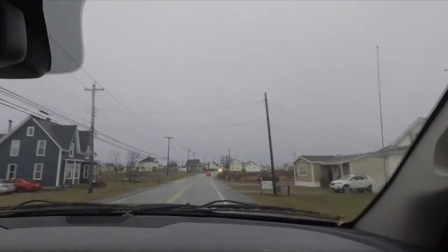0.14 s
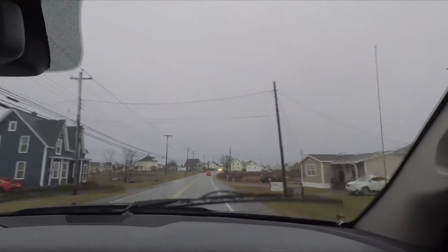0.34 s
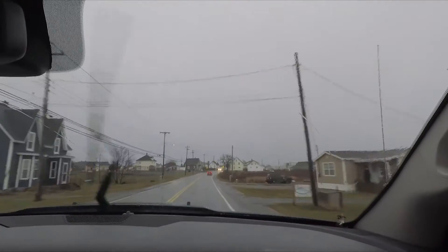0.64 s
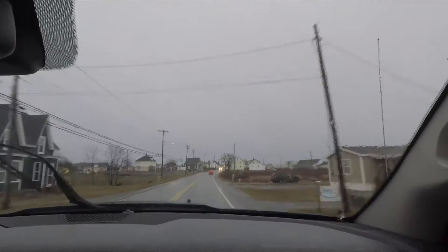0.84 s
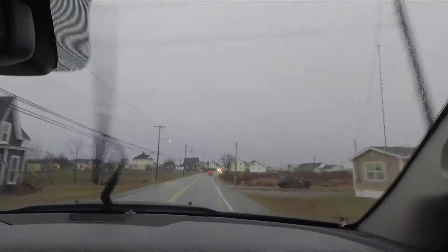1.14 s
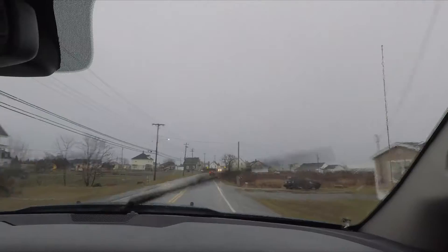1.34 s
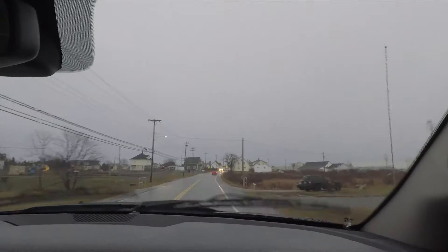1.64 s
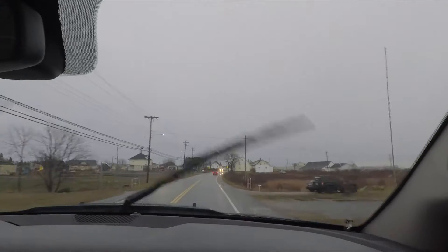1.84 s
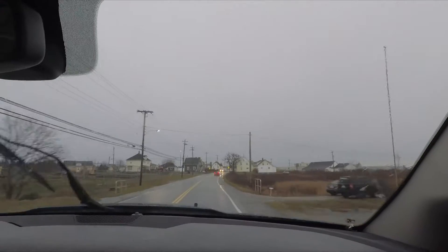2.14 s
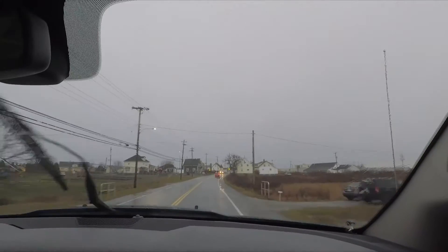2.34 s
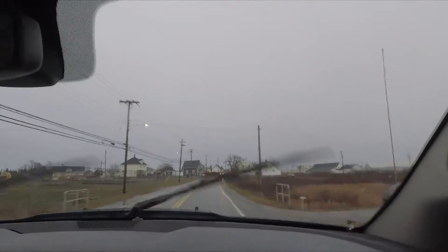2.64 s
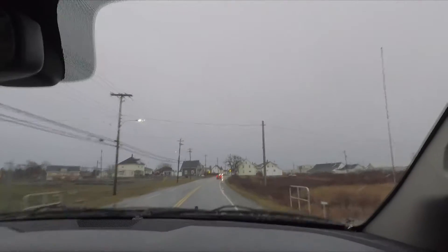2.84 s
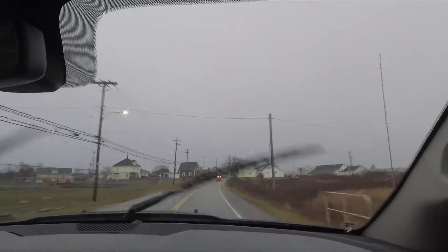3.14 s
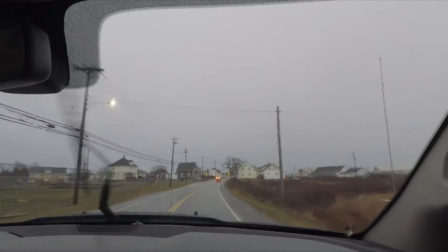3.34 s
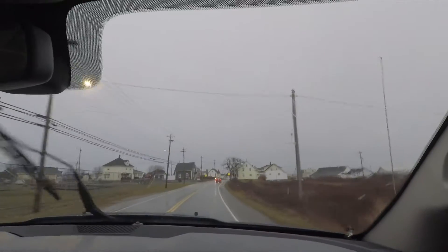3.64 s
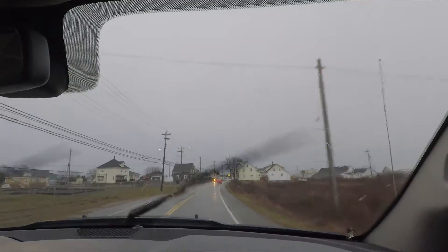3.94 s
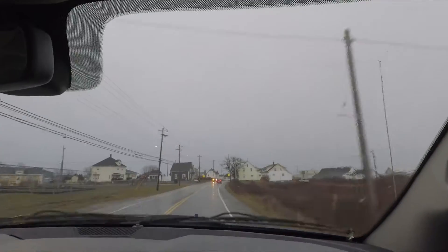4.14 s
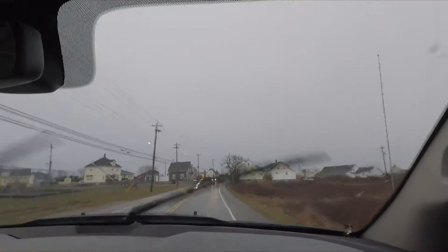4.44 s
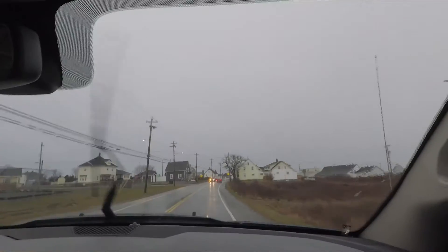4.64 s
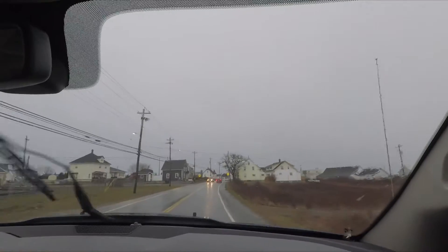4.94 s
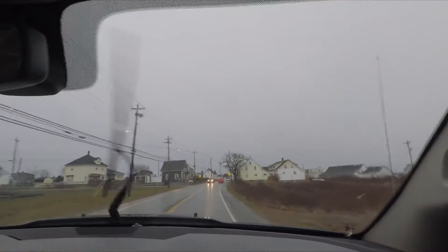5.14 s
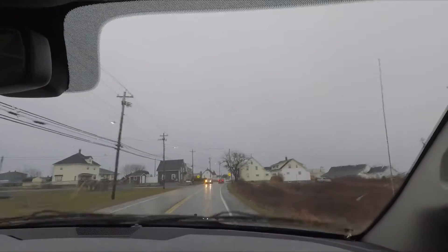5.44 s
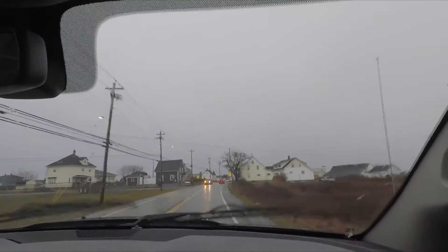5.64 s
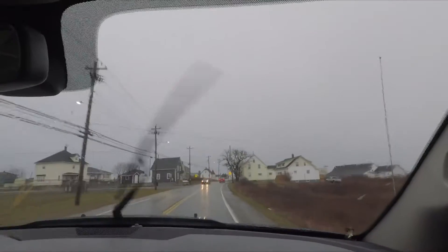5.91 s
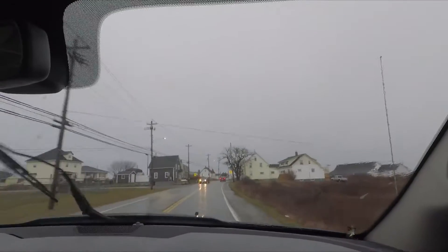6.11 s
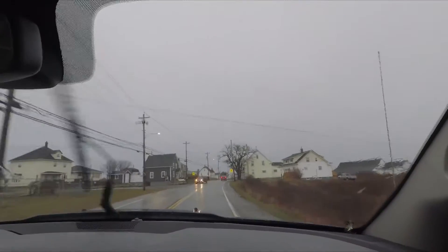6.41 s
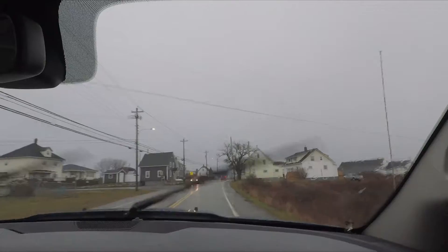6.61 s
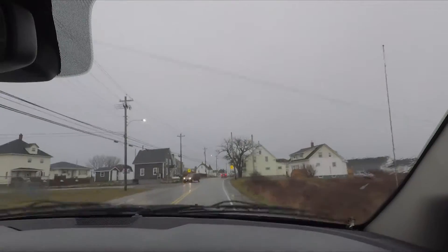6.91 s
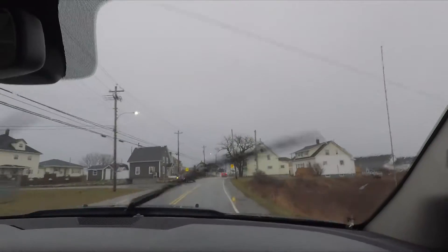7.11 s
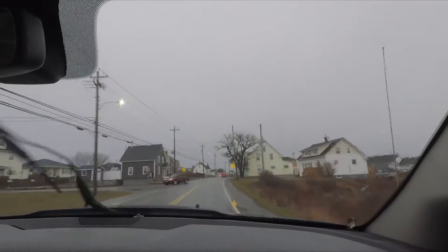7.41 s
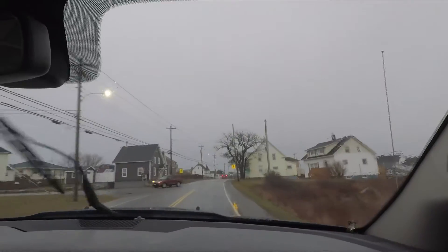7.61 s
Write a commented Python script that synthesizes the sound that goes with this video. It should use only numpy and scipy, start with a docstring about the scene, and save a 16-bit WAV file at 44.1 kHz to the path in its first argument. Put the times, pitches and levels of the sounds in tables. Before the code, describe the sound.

Inside a driving car, dense crisp raindrop taps patter over deep road rumble and a wavering engine drone, with bumps near the end.

```python
"""Heavy rain on a car, heard from inside as it drives.
Drops on windscreen and roof are impulses filtered by a crack, a splat and a padded cabin tail; spray is a faint hiss.
Tyres and body rumble as filtered noise; the engine booms and hums as narrow noise and a throbbing line.
Knocks, some far left, and wheel bumps on a rough patch ring low modes, each with a brush of noise."""
import sys
import numpy as np
from scipy import signal
from scipy.fft import rfft, irfft, next_fast_len
from scipy.io import wavfile

SR = 44100
rng = np.random.default_rng(int(sys.argv[2]) if len(sys.argv) > 2 else 0)


def int16_out(signal):
    """Quantize to a 16-bit WAV file."""
    q = np.round(np.clip(np.atleast_2d(signal).T, -1, 1) * 32767)
    wavfile.write(sys.argv[1], SR, q.astype(np.int16))


def convert_level_to_amplitude(level_db):
    """Map a level in decibels to its linear amplitude factor."""
    exponent = np.asarray(level_db, float) / 20
    return 10 ** exponent


N = 342636

# phase lead of the left ear point: hz, left_lead_rad
LEFT_LEAD = [(30, 0), (400, 0), (690, -.3), (1460, .6), (2070, .1), (2840, -.5), (4650, .1), (6000, -.5),
             (7150, .1), (7600, 3.1), (10000, 3.1), (11500, .1)]
SIDES = np.array([[.5], [-.5]])   # splits a left-right difference over the two channels
SPLAT_T60_S = 0.0052   # on bare glass


def rms_one(x):
    """Scale to rms 1."""
    return x / np.sqrt(np.mean(x ** 2) + 1e-20)


def in_time(rows):
    """Columns of a curve table, one value a sample."""
    s, *columns = np.transpose(rows)
    return [np.interp(np.arange(N) / SR, s, c) for c in columns]


def at_hz(points, hz):
    """Read a spectrum on a log-frequency axis."""
    point_hz, value = np.transpose(points)
    return np.interp(np.log(hz + 1), np.log(point_hz), value)


def drift(corner_hz):
    """Slow random curve of rms 1: noise at SR / 40 through a double one-pole low-pass."""
    r = np.exp(-80 * np.pi * corner_hz / SR)
    noise = rng.standard_normal(N // 40 + 2002)
    slow = signal.lfilter([1], [1, -2 * r, r * r], noise)[2000:]   # settled part
    return np.interp(np.arange(N) / 40, np.arange(len(slow)), rms_one(slow))


def band(x, low_hz, high_hz):
    """Band-pass."""
    return signal.sosfilt(signal.butter(2, [low_hz, high_hz], "band", fs=SR, output="sos"), x)


def port_noise(spectrum, size):
    """Coloured noise at two close microphone ports: a shared part with a phase lead, plus a part of each port's own."""
    # left-right likeness: hz, likeness_0_to_1
    likeness = [(25, 0.13), (60, 0.37), (87, 0.9), (130, 0.78), (180, 0.96), (380, 0.88), (550, 0.8),
                (800, 0.54), (1160, 0), (1680, 0.21), (2430, 0.34), (3520, 0.77), (5100, 0.44),
                (7380, 0.13), (9000, 0), (12000, 0)]
    # level balance: hz, left_minus_right_db
    lean = [(30, -3.5), (60, 2), (110, 0.5), (200, 2.5), (360, 1.5), (670, 0.5), (1210, -0.5), (2220, -0.5),
            (4040, 1.5), (7380, -1)]
    hz = np.fft.rfftfreq(size, 1 / SR)
    shared, *own = rfft(rng.standard_normal((3, size)))
    alike = np.clip(at_hz(likeness, hz), 0, 1)
    common = np.sqrt(alike) * shared * np.exp(1j * SIDES * at_hz(LEFT_LEAD, hz))
    pair = common + np.sqrt(1 - alike) * np.array(own)
    return rms_one(irfft(pair * convert_level_to_amplitude(at_hz(spectrum, hz) + SIDES * at_hz(lean, hz)), size))


def tap_answer(roof):
    """Answer of one spot to a unit drop, as dull, middle and bright parts: crack with echoes, splat, cabin tail."""
    # average colour of a drop's tap, on glass or roof: hz, level_db_per_hz
    tap = [(500, -1.5), (900, -22), (1200, -4), (1510, -8.5), (2150, -4.5), (3000, -0.5), (3500, 0),
           (4300, -3.5), (5000, -4.5), (5800, 0.5), (6500, -3.5), (7800, -9.5), (10200, -23), (12600, -39),
           (15500, -47)]
    # cabin tail of the dull, middle and bright part: tail_re_splat_db, t60_s
    tails = [(-2.5, 0.12), (-3, 0.03), (-2.5, 0.052)]
    t = np.arange(6144) / SR
    hz = np.fft.rfftfreq(len(t), 1 / SR)
    colour = [(f, db + 1.5 * rng.standard_normal()) for f, db in tap]   # each spot strays from the average
    splat_db = -6.5

    # the crack comes back from dash, glass and roof
    crack_delay_s = .0006
    late_s = .014 * rng.random((6, 1)) ** 2 + crack_delay_s
    echo_gain = convert_level_to_amplitude(-3 - 900 * late_s) * rng.uniform(-1.06, 1, late_s.shape)   # loses 900 dB/s
    echoes = echo_gain * np.exp(-2j * np.pi * hz * late_s)
    phase = at_hz(LEFT_LEAD, hz) * SIDES - 2 * np.pi * hz * crack_delay_s
    crack = irfft(convert_level_to_amplitude(at_hz(colour, hz)) * (1 + echoes.sum(axis=0)) * np.exp(1j * phase))
    crack_re_splat_db = -1 if roof else 8   # the roof muffles the crack
    crack = convert_level_to_amplitude(crack_re_splat_db + splat_db) * crack / np.abs(crack).max()

    both = np.array([port_noise(colour, size=len(t)), crack])
    dull = signal.sosfiltfilt(signal.butter(2, 2700, fs=SR, output="sos"), both)
    bright = signal.sosfiltfilt(signal.butter(2, 4200, "high", fs=SR, output="sos"), both)
    parts = [dull, both - dull - bright, bright]

    slower = 4 if roof else 1   # the roof draws out rise and splat
    rise = 1 - np.exp(-t / .00025 / slower)
    splat = convert_level_to_amplitude(-60 * t / SPLAT_T60_S / slower - 10 * np.log10(slower) / 2)
    answer = []
    for (noise, click), (tail_db, t60_s), click_db in zip(parts, tails, (-4, -1, 0)):
        shape = convert_level_to_amplitude(splat_db) * rise * (splat + convert_level_to_amplitude(tail_db - 60 * t / t60_s))
        loudness = np.std(noise) * np.sqrt(np.mean(shape ** 2))   # evens out the random envelope
        answer.append(convert_level_to_amplitude(click_db) * click * rise + rms_one(noise * shape) * loudness)
    return answer


def small_drops():
    """Random drops in flurries, many small and few large, as rows like those of the placed ones."""
    # patter of the random drops, thinning as the shower eases, with brief lulls: start_s, level_db
    patter = [(0, -38.5), (.19, -42.5), (.23, -49), (.28, -42), (.41, -44), (.53, -37.5), (.6, -41),
              (.69, -45), (.74, -39), (.795, -46), (.83, -37.5), (.86, -38), (.93, -54.5), (.98, -44.5),
              (1.04, -42), (1.3, -43), (1.5, -42.5), (1.57, -45.5), (1.62, -45), (1.69, -41), (2.0, -42),
              (2.3, -42), (2.36, -47.5), (2.55, -44.5), (2.73, -51.5), (2.79, -44.5), (2.9, -45),
              (3.0, -46), (3.1, -44), (3.3, -43.5), (3.5, -46), (3.8, -47), (3.92, -47.5), (3.98, -50.5),
              (4.11, -45), (4.21, -54), (4.33, -48), (4.39, -46.5), (4.45, -47), (4.76, -48.5), (4.95, -45),
              (5.11, -43), (5.38, -49.5), (5.45, -42.5), (5.65, -44.5), (5.86, -43.5), (5.92, -56.5),
              (6.0, -44.5), (6.14, -43.5), (6.19, -51), (6.22, -44), (6.31, -48.5), (6.35, -54),
              (6.39, -48), (6.44, -46.5), (6.52, -46), (6.56, -52), (6.62, -44), (6.88, -47), (6.95, -40.5),
              (7.06, -44), (7.1, -55.5), (7.22, -47.5), (7.31, -46.5), (7.35, -58.5), (7.42, -55),
              (7.5, -43.5), (7.77, -47)]
    drops_per_s = 800   # typical rate, swung by a drift
    level_db = in_time(patter)[0] + 0.8 * drift(12.4)
    when, luck, size = rng.random((3, 30000))
    dull, bright, side = rng.standard_normal((3, len(when)))
    at = (when * N).astype(int)
    falls = luck < drops_per_s * convert_level_to_amplitude(1.5 * drift(15)[at]) * N / SR / len(when)
    size_db = np.minimum(-5 * np.log(size + 1e-9), 8.5)
    peak_db = level_db[at] + size_db - 10 * np.log10(drops_per_s * SPLAT_T60_S / 10)   # allows for overlap
    return np.stack([at / SR, peak_db, 2.5 * dull, 3 * bright, 1.2 * side], axis=1)[falls]


def rain():
    """Drops strike 12 spots each of glass and roof; each impulse has its own size, colour and side."""
    # drops placed one by one, loud and faint: start_s, peak_db, dull_re_peak_db, bright_re_peak_db, left_minus_right_db
    placed_drops = [(0.1033, -28, -27, -2, 2), (0.1303, -33, -20, -9, 0), (0.137, -13, -17.5, -0.5, 3),
                    (0.2099, -19, -18, -10, 1), (0.2443, -23, -26, -3, 3), (0.265, -19.5, -14.5, -13, 0),
                    (0.3513, -25, -9.5, -12, 2), (0.4168, -34, -18, -22, 3), (0.4444, -29, -9, -12, 0.5),
                    (0.4688, -16.5, -25, -11, -4), (0.502, -28, -13, -9, -1), (0.5215, -20.5, -11, -8, 2),
                    (0.5729, -15, -18, -18, -0.5), (0.6265, -22, -19, -9, 0.0), (0.6599, -15, -23, -8.5, 1),
                    (0.706, -26.5, -10, -8, 2), (0.7524, -15.5, -16, -8.5, 1), (0.815, -37, -29, -9, 4),
                    (0.8278, -13, -19, -12, 0.0), (0.8711, -17.5, -14, -5.5, 0), (0.903, -29, -19, -2, 1),
                    (0.9244, -19, -15, -9, 0), (0.989, -21, -24, -14, -1), (1.0347, -22.5, -8.5, -7, -2),
                    (1.0827, -22, -17, -1, 1.5), (1.128, -16.5, -20, -13, 2), (1.175, -40, -9, -15, 0.5),
                    (1.2074, -17.5, -15.5, -5, 3), (1.3395, -20, -27, -4.5, -2),
                    (1.3526, -8.5, -20, -9, 0.5), (1.412, -18, -24, -12, -4), (1.4632, -27.5, -8, -5, -2),
                    (1.4755, -31, -20, -6, 7), (1.482, -17, -12, 0.5, 2.5), (1.5544, -21, -16, -3.5, 2),
                    (1.582, -27, -16, -19, -2), (1.615, -30.5, -6, -23, 0.0), (1.67, -14.5, -22, -13, 1),
                    (1.6858, -19, -18, -10, 1.5), (1.7897, -18, -17, -2, -0.5), (1.8485, -23, -25, -2, -1),
                    (1.9035, -23, -27, -27, 1.0), (1.935, -13, -20, -11, -2), (2.0179, -32, -12, -18.5, -2),
                    (2.03, -30, -21, -13, -1.0), (2.0401, -15.5, -23, -10, 1), (2.0938, -18, -16, -19, 5),
                    (2.1698, -15.5, -19, -11.5, -2), (2.1907, -19, -19, -9, 5), (2.256, -6, -22, -21, 1.5),
                    (2.297, -17, -23, -6.5, -0.5), (2.326, -23, -13, -5.5, 0.5),
                    (2.3853, -19, -23, -7.5, 0), (2.411, -24, -23, -5, -2), (2.511, -23, -18, 1, 3),
                    (2.5606, -43, -24, -6, 1.0), (2.6396, -39, -13, -14, -2), (2.659, -26, -8.5, -9, 0.5),
                    (2.6763, -17, -10.5, -9, 0), (2.702, -27, -14, -11, 1.0), (2.7467, -9, -23, -5, -1),
                    (2.778, -20, -13, -7, 0), (2.805, -33, -19, -10, 0), (2.836, -28, -18, -10, 5),
                    (2.914, -24, -16, -4, 2.0), (3.016, -21.5, -12.5, -4, 1.0), (3.109, -36, -2, -26, 7),
                    (3.1575, -26.5, -12.5, -9, 5), (3.2148, -15, -16, -18, 2),
                    (3.241, -19, -21.5, -10, 1.0), (3.3026, -35, -14, -6, 1), (3.3609, -23, -11.5, -8, 0),
                    (3.3962, -15.5, -12.5, -8, 0.0), (3.46, -17, -18.5, -11, 3),
                    (3.481, -22, -16, -10, 0.0), (3.59, -27.5, -11, -13, -3), (3.623, -20, -18, -8, 0),
                    (3.6414, -24.5, -19.5, -5, -2), (3.696, -22.5, -17, -11, 2),
                    (3.7162, -25, -17, -2.5, 3), (3.7468, -18, -23, -10, -2), (3.756, -25, -15, -6, 3),
                    (3.7751, -21.5, -14, -8, -2), (3.794, -23.5, -12, -3, 1), (3.821, -34.5, -22, 0.5, -18),
                    (3.8746, -42, -15, -18, 0.0), (3.894, -17.5, -19, -17, -1.0),
                    (3.9445, -23.5, -18, -7, 0.0), (3.9913, -32.5, -21, -14, 1.0),
                    (4.0408, -18, -23, -7.5, 4), (4.0783, -29, -15, -15, 0), (4.093, -26.5, -17, -10, 1),
                    (4.132, -26, -16, -9, 0), (4.193, -23, -18, -10, -1), (4.236, -26.5, -15, -16, -1.0),
                    (4.2476, -20.5, -14, -8, 0), (4.2895, -23, -13.5, -13, -1), (4.3077, -33, -13, -12, 9),
                    (4.3202, -23, -25, -6.5, -1), (4.336, -25, -16, -5, 1), (4.3457, -19, -17, -8, 1),
                    (4.3544, -20, -16, -12, -1), (4.4085, -29.5, -13.5, -15, 2.0),
                    (4.4271, -20, -11, -7.5, 0), (4.4404, -30, -28, -14, 1.0),
                    (4.4624, -24, -15.5, -9, 1.0), (4.4784, -19, -18, -12, 2), (4.5098, -12, -22, -16, -1),
                    (4.5483, -31, -14, -6, -1), (4.568, -24, -20, -8, -1), (4.596, -22.5, -22, -5, -1),
                    (4.619, -33, -15, -12, 1), (4.6432, -19.5, -15, -10, -2), (4.7167, -22, -16, -10, 2),
                    (4.778, -23.5, -18.5, -9.5, 1), (4.8499, -34, -24, -10, 2.0), (4.89, -20, -17, -8, 2),
                    (4.9022, -16, -19.5, -11.5, 2), (4.9931, -20.5, -21, -6.5, 2),
                    (5.016, -20, -21, -5, -2), (5.0476, -22.5, -16, -7.5, 2), (5.0887, -27, -12, -16, -2),
                    (5.117, -36, -17, -14, 3), (5.129, -30, -13, -18, 1.5), (5.1961, -39, -15, -18, 4),
                    (5.221, -16.5, -19.5, -14, 2), (5.261, -22, -26, -9, 2), (5.2987, -24, -11, -8, 0),
                    (5.3603, -25, -21, -5, -2), (5.401, -21.5, -14.5, -7, -1), (5.4293, -18.5, -19, -12, 4),
                    (5.457, -16, -25, -13, 4), (5.4889, -19, -17.5, -8, 2), (5.5133, -24, -17, -16, -9),
                    (5.543, -46, -13, -21, 0), (5.5744, -19, -21, -7.5, 0.0), (5.6386, -13.5, -17, -13, 0),
                    (5.693, -16, -24, -12, -5), (5.7662, -17.5, -15, -11, 2), (5.8, -23, -16.5, -1, -3),
                    (5.8245, -31, -2, -10, 6), (5.849, -26.5, -19, -7, -2), (5.877, -22, -13, -22, 2),
                    (5.9323, -17, -20, -14, 1), (5.9635, -21, -14, -8, -2), (6.0132, -18, -19, -10, 3),
                    (6.061, -23, -11, -8.5, -1), (6.099, -28, -15, -9, -3), (6.1225, -22, -26, -9, 4),
                    (6.137, -28.5, -7, 0, 4), (6.1453, -22.5, -13, -5.5, -1), (6.202, -17, -20, -10, -2),
                    (6.2111, -17.5, -17.5, -9, -1), (6.2588, -18.5, -23, -7, 2),
                    (6.2998, -18.5, -16, -9, 0), (6.328, -21, -16, -8, 2), (6.3923, -30, -11, -12, 3),
                    (6.4088, -19.5, -18, -13, -2), (6.4358, -24, -13, -7, 3), (6.484, -26, -11, -10, 5),
                    (6.4974, -26, -25, -4.5, 1), (6.5247, -24, -19, -12, 0.0), (6.5878, -32, -18, -10, 0.0),
                    (6.6134, -18.5, -18, -8, 3), (6.69, -21.5, -12.5, -9, 4), (6.728, -21.5, -17, -9, 3),
                    (6.7507, -21, -13.5, -3, 1), (6.796, -32, -8, -18, -5), (6.8284, -28, -20, -5, 0),
                    (6.8608, -30, -32, -3, 3), (6.9168, -17, -18, -7, 1), (6.9426, -18.5, -16, -5.5, 1),
                    (6.9726, -27, -23, -12, 3), (6.991, -25.5, -15, -1.5, -1), (7.01, -32, -23, 1, 2),
                    (7.1022, -24, -22, -8, -1), (7.137, -21.5, -26, -9, 3), (7.165, -39, -17, -19, 1),
                    (7.18, -20, -19, -10.5, 3), (7.2519, -17.5, -20, -7, 0.5), (7.2847, -28, -17, -13, 2),
                    (7.3126, -21.5, -19, -9, -1), (7.322, -22.5, -13, -8, 0), (7.396, -31, -17, -7, 0.5),
                    (7.426, -17.5, -14, -15, 0), (7.447, -38, -22, -12, 0), (7.462, -26, -14, -8, 0),
                    (7.4687, -23, -21, -6, 0), (7.497, -25, -15, -8, 0), (7.528, -31, -22, -13, 4),
                    (7.5905, -32, -16, -13, 0.0), (7.6535, -23, -13, -9, 0.5), (7.6833, -24.5, -13, -5, -4),
                    (7.711, -27, -17, -10, 8)]
    placed = np.array(placed_drops)
    placed[:, 2:4] -= placed[:, 2:4].mean(axis=0)   # colour counts from the average tap
    drops = np.concatenate([placed, small_drops()])
    size = next_fast_len(N + 6144)
    spots, out = 12, 0
    for roof in False, True:
        landed = drops[(drops[:, 3] < 1.2) == roof]   # brighter drops fall on bare glass, others on lined roof
        for spot in range(spots):
            s, peak_db, dull_db, bright_db, pan_db = landed[spot::spots].T
            for part, part_db in zip(tap_answer(roof), [dull_db, 0, bright_db]):
                clicks = np.zeros((2, N))
                clicks[:, (s * SR).astype(int)] = convert_level_to_amplitude(peak_db + part_db + pan_db * SIDES)
                out = out + rfft(clicks, size) * rfft(part, size)
    return irfft(out, size)[:, :N]


def spray():
    """Spray outside: a faint even hiss of coloured noise under the drops."""
    # hiss colour: hz, level_db_per_hz
    hiss = [(800, -1), (2000, -13), (6000, -29), (9000, 2), (12000, -4), (15500, -13)]
    return convert_level_to_amplitude(-62) * port_noise(hiss, size=next_fast_len(N))[:, :N]


def road():
    """Tyre and body rumble in three noise bands; drone and roar swell with the surface, surge and flutter."""
    # rumble colour: hz, level_db_per_hz
    rumble = [(12, 4), (22, -8.5), (35, -1.5), (50, -7), (75, -8.5), (88, -8), (118, -8), (151, -14),
              (230, -20), (325, -20), (450, -24), (620, -25.5), (967, -29.5), (1510, -37.5), (2500, -43.5),
              (4000, -67)]
    # surface roughness, rising over the rough patch: start_s, level_db
    surface = [(0, 1.5), (2.3, 1), (3.0, 0.5), (6.64, 0.34), (6.73, 6.5), (6.9, -1), (7.08, -0.5),
               (7.17, 4.5), (7.28, 1.5), (7.77, 1.5)]
    # deepest rumble: start_s, level_db
    deep = [(0, -14), (1.2, -14.5), (2.2, -13), (3.0, -13), (4.0, -14), (5.2, -14.5), (6.2, -13),
            (6.75, -14.5), (7.2, -14.5), (7.77, -14)]
    rough_db, = in_time(surface)
    deep_db, = in_time(deep)
    size, surge = next_fast_len(N), drift(13.5)
    boom = band(port_noise(rumble, size=size), 16, 138.6)[:, :N]
    drone = band(port_noise(rumble, size=size), 143.0, 382)[:, :N]
    roar = band(port_noise(rumble, size=size), 435, 2500)[:, :N]
    drone_db = -27.5 + rough_db + 1.1 * surge + 0.95 * drift(7.3)
    roar_db = -37.5 + 0.51 * rough_db + 0.1 * surge + 1.73 * drift(39)
    return convert_level_to_amplitude(deep_db) * rms_one(boom) + convert_level_to_amplitude(drone_db) * rms_one(drone) + convert_level_to_amplitude(roar_db) * rms_one(roar)


def engine():
    """A ragged cabin boom, a clean line in it that throbs once a wheel turn, and a hum about an octave below."""
    # engine course: start_s, ragged_boom_db, boom_hz, hum_db, clean_line_db, throb_share_0_to_1
    course = [(0, -19, 122, -29.5, -38, 0.3), (1.2, -24, 121, -21, -27.5, 0.1),
              (2.0, -22.5, 122, -23, -25.5, 0.37), (2.9, -23.5, 122, -26.5, -28.5, 0.9),
              (3.7, -27.5, 122, -18.5, -25, 0.66), (4.0, -44, 122.3, -20, -23, 0.5),
              (4.7, -35, 122.5, -22.5, -21, 0.9), (5.2, -30, 122.6, -20, -19.5, 0.57),
              (5.8, -32, 122.5, -25.5, -21.5, 0), (6.4, -21, 122.3, -34, -14.5, 0.17),
              (6.72, -27, 122.4, -24.5, -19.5, .5), (6.95, -28, 121, -21, -20, 0.7),
              (7.3, -25, 117, -30, -22.5, 1), (7.77, -35, 117, -36, -22, .7)]
    boom_db, boom_hz, hum_db, line_db, throb = in_time(course)
    lead_rad = np.array([[.15], [-.15]])

    def narrow(hz, width_hz):
        """Wandering tone with a steady part and two random quadratures."""
        steady = .7   # re random part
        turn = 2 * np.pi * np.cumsum(hz + width_hz / 3 * drift(width_hz)) / SR + lead_rad
        tone = (steady + drift(width_hz)) * np.sin(turn) + drift(width_hz) * np.cos(turn)
        return tone / np.sqrt(1 + steady ** 2 / 2)

    turn = 2 * np.pi * np.cumsum(boom_hz + .45 * drift(2.2)) / SR + lead_rad
    wheel_turns_per_s, crest_s = 6.15, 4.595
    wheel = 2 * np.pi * wheel_turns_per_s * (np.arange(N) / SR - crest_s)
    line = np.sqrt(2) * (np.sin(turn) + np.clip(throb, 0, 1) * np.sin(turn + wheel))
    mix = (convert_level_to_amplitude(boom_db) * narrow(boom_hz, width_hz=10.0) + convert_level_to_amplitude(line_db) * line
           + convert_level_to_amplitude(hum_db) * narrow(63, width_hz=4.5))
    return mix * convert_level_to_amplitude([[.9], [-.9]])   # leans left


def blows(events, modes, soft):
    """Soft blows ring a few low panel modes, each blow leaning to the low or the high ones."""
    s, peak_db, pan_db, _, tilt_db = np.array(events).T
    out = 0
    for hz, mode_db, t60_s in modes:
        clicks = np.zeros((2, N))
        lean_db = tilt_db * np.log2(hz / modes[1][0])   # tilt per octave about the second mode
        clicks[:, (s * SR).astype(int)] = convert_level_to_amplitude(peak_db + pan_db * SIDES + lean_db)
        r, w = convert_level_to_amplitude(-60 / (t60_s * SR)), 2 * np.pi * hz / SR
        ring = signal.lfilter([0, np.sin(w)], [1, -2 * r * np.cos(w), r * r], clicks + 1e-18)
        out = out + convert_level_to_amplitude(mode_db) * ring
    return signal.lfilter([1 - soft], [1, -soft], out)   # padded contact


def scuffs(events, spectrum, t60_s, rise_s):
    """Each blow carries a short dull brush of noise."""
    t, out = np.arange(8192) / SR, np.zeros((2, N + 8192))
    for s, _, _, scuff_db, _ in events:
        at = int(s * SR)
        shape = convert_level_to_amplitude(scuff_db - 60 * t / t60_s) * (1 - np.exp(-t / rise_s))
        out[:, at:at + len(t)] += port_noise(spectrum, size=len(t)) * shape
    return out[:, :N]


def knocks():
    """Knocks in the trim and wheel bumps through the floor, each a ring and a brush of noise."""
    # knocks: start_s, peak_db, left_minus_right_db, scuff_db, tilt_db_per_octave
    trim = [(0.058, -10.5, 1.5, -23, 2), (0.5, -13.5, 2, -25, -2), (0.709, -33, 2.5, -25.5, 0.),
            (0.9118, -9.5, 25.5, -43, 2.5), (2.97, -14, 2, -29, 0.), (4.015, -16, 25, -52, -2),
            (4.903, -7, 2, -31, 2), (5.869, -12, 18.5, -37, 4)]
    # trim modes: hz, level_db, t60_s
    trim_modes = [(215, -11, 0.07), (320, -5, 0.1), (510, -20, 0.06), (900, -30, 0.04)]
    # brush colour: hz, level_db_per_hz
    brush = [(200, -10), (400, 0), (800, 0), (1200, 0), (1700, -5), (2200, -20), (4000, -70)]
    # wheels on the rough patch, front then rear: start_s, peak_db, left_minus_right_db, thud_db, tilt_db_per_octave
    bumps = [(6.7, -15.5, 1.5, -21, -1), (6.72, -15.5, 2, -25, 2.5), (6.749, -14, 1, -33, -9.5),
             (6.812, -14.5, 7, -26, 0), (6.88, -26, 5, -31, 9.5), (7.114, -12, 2.5, -36, 1.5),
             (7.166, -9.5, 2.5, -24, 2), (7.2, -17.5, 2, -32, 0.)]
    # floor modes: hz, level_db, t60_s
    floor_modes = [(81, -0.5, 0.14), (164, 7, 0.14), (255.6, -1.5, 0.2), (300, -5.5, 0.1),
                   (402, -9.5, 0.069), (508, -9, 0.1), (700, -26, 0.05)]
    # thud colour: hz, level_db_per_hz
    thud = [(50, -3), (100, 0), (200, -2), (400, -5), (800, -12), (1400, -30), (3000, -80)]
    return (blows(trim, trim_modes, soft=.93) + scuffs(trim, brush, t60_s=0.12, rise_s=0.002)
            + blows(bumps, floor_modes, soft=.97) + scuffs(bumps, thud, t60_s=0.25, rise_s=0.014))


def scene():
    """Rain above, road and engine below."""
    return rain() + spray() + road() + engine() + knocks()


def roll_off(x):
    """The treble ends steeply here."""
    return signal.sosfilt(signal.butter(12, 15800, fs=SR, output="sos"), x)


def record(dry):
    """Soft saturation rounds the tallest peaks."""
    rounded = 1.172 * np.tanh(dry / 1.432)
    return roll_off(rounded)


dry = scene()
out = record(dry)
int16_out(out)
```